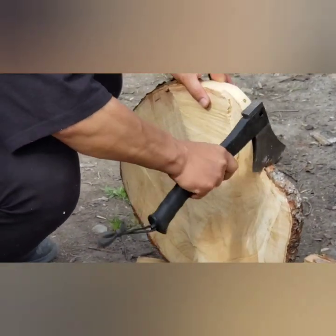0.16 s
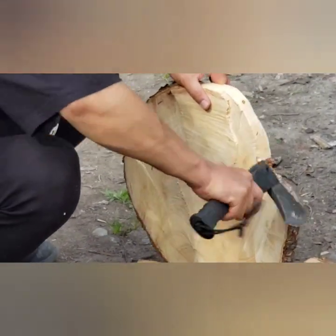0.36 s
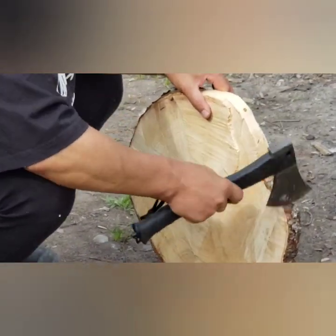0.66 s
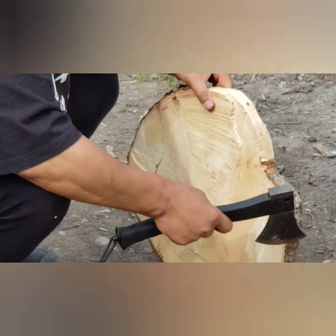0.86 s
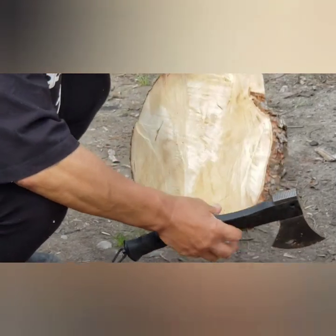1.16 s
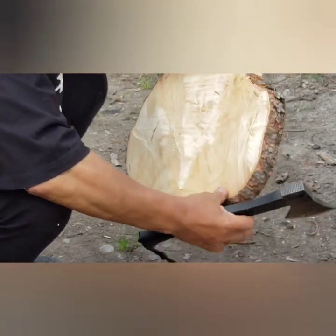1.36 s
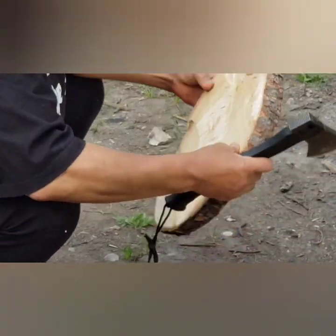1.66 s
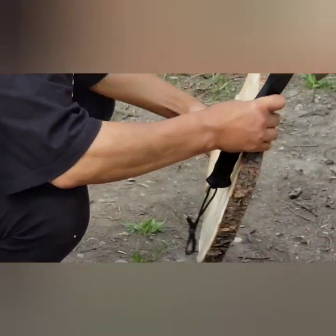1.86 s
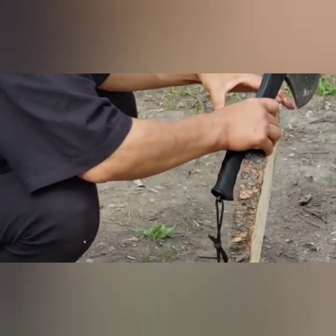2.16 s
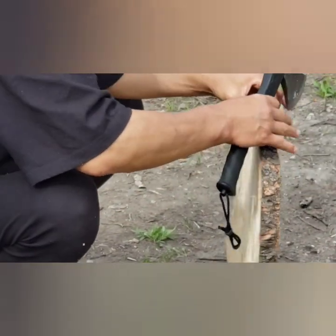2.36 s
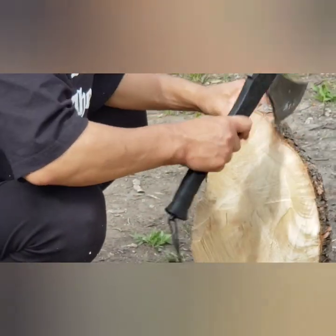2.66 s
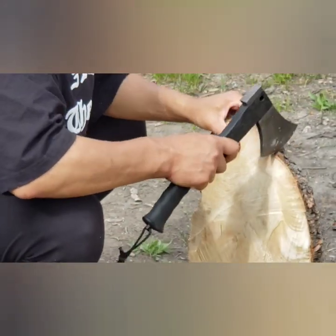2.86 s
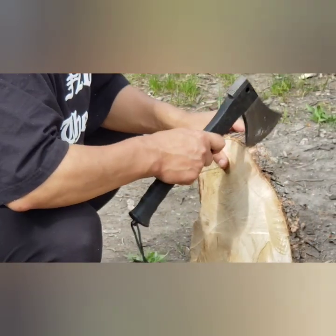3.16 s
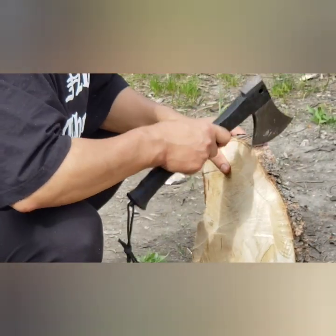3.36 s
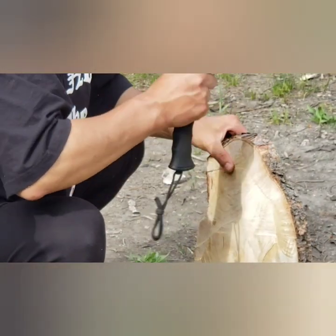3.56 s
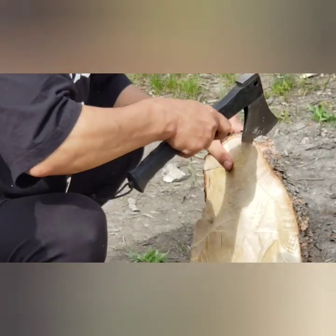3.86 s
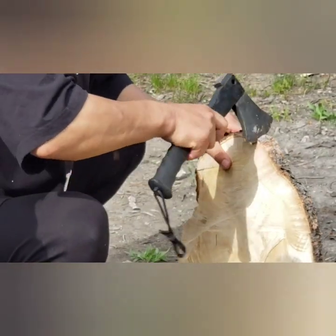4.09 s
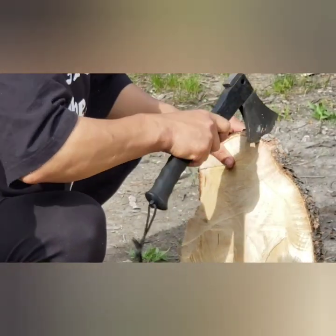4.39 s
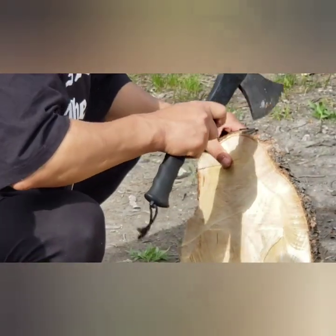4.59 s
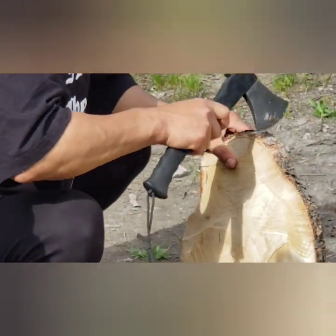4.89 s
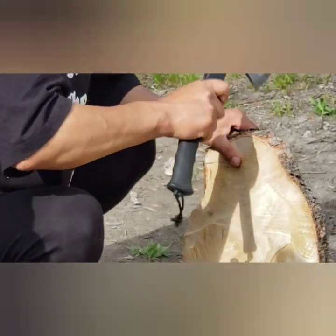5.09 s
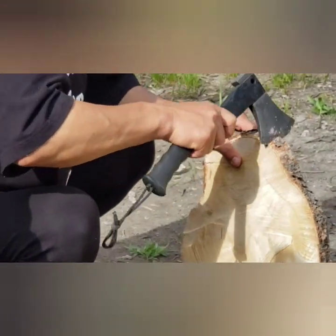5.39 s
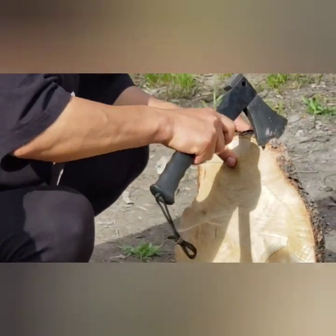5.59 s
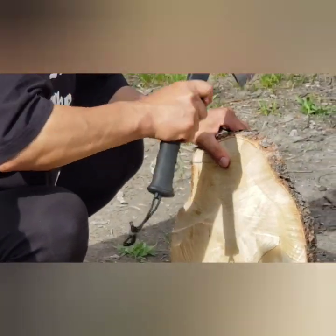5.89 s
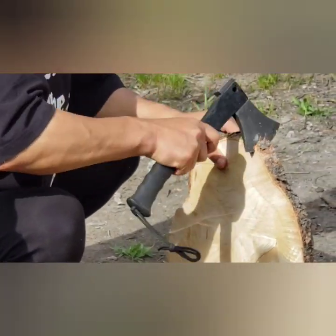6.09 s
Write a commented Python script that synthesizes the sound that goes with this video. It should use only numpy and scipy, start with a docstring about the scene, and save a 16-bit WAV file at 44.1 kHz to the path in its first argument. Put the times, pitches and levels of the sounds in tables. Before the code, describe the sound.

A hatchet chops and pries bark off a log slice outdoors, with sparse woody knocks, dry crackles, and wind buffeting the microphone midway.

```python
"""Hatchet on bark, outdoors

A hatchet chips and pries the bark off a log slice at an outdoor campsite. Each blow is a burst of
crushed-bark noise over decaying modes of the slab; short tuned noise bursts make single snaps and
the woody knock in the hardest blows, and crumbs rustle as random ticks. Midway, gusts buffet the
microphone as turbulent noise and short low thumps at each port. A low distant rumble, diffuse air,
a thin high hiss and a few faint gliding bird notes lie beneath."""
import sys
import numpy as np
from scipy import signal
from scipy.fft import rfft, irfft
from scipy.io import wavfile
from scipy.ndimage import uniform_filter1d

SR = 44100
rng = np.random.default_rng(int(sys.argv[2]) if len(sys.argv) > 2 else 0)


def bounce(signal):
    """Save signal as a 16-bit WAV file at the path given by the first command-line argument."""
    frames = np.transpose(np.atleast_2d(signal))
    limited = np.clip(frames, -1, 1)
    pcm = np.round(limited * 32767).astype(np.int16)
    wavfile.write(sys.argv[1], SR, pcm)


N = 275184
TIME = np.arange(N) / SR

# Levels in the tables are relative; most sources add a gain of their own.
# hatchet blows: time_s, knock_db, knock_tilt_db_per_octave, thud_db, crunch_db,
# crunch_tilt_db_per_octave, crunch_rise_s, right_over_left_db (crunch only)
BLOWS = [(0.2124, -49.5, 5, -47, -52, -2, 0.0043, 7.5), (.231, -53, 0, -41, -56.5, -4, 0.0082, 0),
         (.296, -47.5, 1, -39, -39, 7, 0.0015, 5), (0.3111, -53.5, 4, -51, -44.5, -1, 0.0036, 3.5),
         (2.066, -41, -15, -28, -49.5, -2, 0.0074, 8), (2.759, -60.5, -1.5, -52, -52.5, -4, 0.0087, 3),
         (3.192, -50.5, 7, -50, -40.5, 1, 0.00088, 1), (3.7185, -28, 5, -39, -36, 0.5, 0.0014, 6),
         (4.797, -50.5, 10, -62, -49.5, 3.5, 0.0048, 3.5), (5.188, -39.5, -2, -41, -35, 2.5, 0.0023, 1),
         (5.988, -30, -4, -38.5, -37.5, 2, 0.0024, 1.5)]
# short tuned noise bursts, single snaps and the woody knock within the hardest blows:
# time_s, level_db, centre_hz, right_over_left_db
TUNED_BURSTS = [(.042, -52.5, 11100, 10), (0.2104, -53.5, 4200, 19), (.293, -35, 11060, 15),
                (.2955, -31.5, 11000, 5), (.3091, -26, 11300, 16.5), (0.315, -35.5, 11500, -7),
                (0.3116, -44.5, 5730, 17.5), (.476, -52, 7660, 9), (1.712, -53, 11500, 6),
                (2.0688, -45, 3570, 11), (2.084, -49, 3570, 5), (2.444, -65, 5540, 15),
                (2.902, -64, 11000, 14), (3.1909, -37.5, 9760, 5), (3.2305, -45, 10500, -1),
                (3.2427, -45, 11300, -1), (3.357, -57.5, 10100, 17), (3.7186, -32.5, 1630, -3),
                (3.7319, -37, 3800, -3), (3.832, -54, 10700, 7), (4.078, -54, 10000, 6),
                (4.114, -44, 10500, 4), (4.115, -54, 4020, 10), (4.202, -43.5, 11600, 7),
                (5.189, -38, 2250, 3), (5.2012, -44, 4300, 11), (5.537, -64, 6860, 11),
                (5.99, -42.5, 1240, 5), (6.001, -41.5, 4350, 5), (6.016, -46.5, 4350, 0)]
# modes of the wooden slab: pitch_hz, level_db, t60_s
SLAB_MODES = [(610, -16, 0.042), (697, 3.5, 0.041), (856, -6.5, 0.048), (1259, -8, 0.047),
              (1514, -13, 0.017), (1920, -19, 0.025), (2430, -16.5, 0.022), (2667, -9, 0.013),
              (3810, -14.5, 0.024)]
# modes of the slab shoved against the ground: pitch_hz, level_db, t60_s
THUD_MODES = [(85.6, -1.5, 0.12), (137, -9.5, 0.18), (181, -3.5, 0.086), (235.7, -0.5, 0.081),
              (299.8, -3, 0.11), (373.4, -7, 0.087)]
# the blade pries at the bark: start_s, length_s, rise_s, level_db
PRIES = [(.035, 0.083, 0.013, -60), (0.18, 0.12, .015, -59), (1.523, 0.027, 0.013, -65),
         (1.701, 0.069, 0.013, -68.5), (2.04, 0.058, .012, -50), (2.11, 0.11, 0.021, -56.5),
         (2.296, .05, 0.035, -65.5), (2.431, 0.014, 0.013, -61), (2.592, 0.022, 0.023, -64.5),
         (3.21, .07, .025, -58), (4.055, 0.16, 0.043, -56)]
# range of small-splinter pitches: low_hz, high_hz
SPLINTER_RANGE = (3670, 11800)
# spectrum of crushed bark: frequency_hz, density_db
CRUNCH_SPECTRUM = [(300, -2.5), (750, 11), (1020, -2), (1500, 7), (2600, -0.5), (3900, 1), (5500, -9.5),
                   (7500, 0), (10500, -1), (13500, 1.5), (16000, -18.5)]
# spectrum of crumbling bark: frequency_hz, density_db
CRUMB_SPECTRUM = [(500, 0.5), (1500, -1.5), (3500, -8), (5800, -4), (8000, -4.5), (11500, -2.5),
                  (16000, -5)]
# microphone response at close range: frequency_hz, gain_db
PORT_RESPONSE = [(3000, -1.5), (4600, -3), (5600, 0.5), (6800, -7.5), (8500, -8.5), (10000, -7.5),
                 (11200, -5), (12600, -9), (16000, -10)]
# phase by which the left port trails: frequency_hz, lag_rad
LEFT_LAG = [(100, 0.29), (700, 0.12), (2000, 1), (4000, 0.99), (8000, 1), (12000, 0.8)]
# scatter from ground and trees: frequency_hz, t60_s
WOODS_DECAY = [(200, 0.24), (600, 0.34), (1500, 0.21), (4000, 0.21), (10000, 0.066), (16000, 0.28)]
# strength of that scattered tail: frequency_hz, gain_db
SCATTER_GAIN = [(150, 4.5), (350, -1.5), (750, -7), (1500, -4.5), (4000, -1.5), (7500, -3), (11500, -6.5),
                (15000, 4)]
# gusts on the microphone: start_s, length_s, left_db, right_db, eddy_share_db
GUSTS = [(1.625, .17, -28.5, -54, -24.5), (1.884, 0.034, -25.5, -44, -45), (2.003, .12, -27, -47, -17.5),
         (2.135, .29, -26, -37.5, -32), (2.264, 0.083, -25.5, -33.5, -17.5),
         (2.437, 0.13, -27, -45.5, -16.5), (2.581, .16, -24.5, -29.5, -17), (2.804, 0.1, -48, -34, -10),
         (2.873, 0.1, -40, -61, -19), (3.094, 0.071, -39, -35, -13), (3.17, 0.1, -34.5, -31.5, -6.5),
         (3.301, 0.091, -39.5, -47, -12.5)]
# the light wind that carries the gusts: start_s, length_s, left_db, right_db, eddy_share_db
BREEZE = (1.52, 2.03, -47, -48, -28)
# short low thumps of wind, hard or soft, some made of two overlapping pulses:
# time_s, level_db, pitch_hz, left_over_right_db
WIND_PULSES = [(.988, -37, 84, 9), (1.652, -16, 142, 34), (1.916, -21.5, 70, 16.5), (2.168, -16, 89, 24),
               (2.304, -16, 81.4, 19), (2.459, -14, 99, 30), (2.513, -21, 286, 30), (2.535, -17.5, 231, 33),
               (2.707, -24, 73.5, 9.5), (2.731, -19.5, 147, 8.5), (2.7417, -14.5, 295, 18.5),
               (2.837, -32, 149, -9), (3.136, -25, 130, -8.5), (3.174, -24, 109, -5), (3.25, -24.5, 80, 13),
               (3.328, -32, 156, 6.5)]
# spectrum of the slow pressure swings: frequency_hz, density_db
SWING_SPECTRUM = [(15, -34.5), (30, -12.5), (55, 1), (85, -4), (120, -6.5), (170, -11), (250, -26.5),
                  (400, -55), (700, -100)]
# spectrum of the smaller eddies: frequency_hz, density_db
EDDY_SPECTRUM = [(60, -50), (150, 5.5), (260, 3), (370, -4.5), (480, -16.5), (650, -23), (1000, -38),
                 (2000, -86)]
# far surroundings, before and after the wind: time_s, rumble_db, air_db
FAR = [
    [(0.0, -59.5, -74), (0.432, -59, -75), (1.45, -58, -77)],
    [(3.65, -67, -80.5), (5.18, -64, -79), (6.24, -69.5, -77.5)],
]
# spectrum of the far rumble: frequency_hz, density_db
RUMBLE_SPECTRUM = [(20, -23.5), (45, -6), (75, 1.5), (100, 3.5), (135, -11), (200, -22.5), (330, -22.5),
                   (600, -26), (1500, -89.5)]
# spectrum of the diffuse air: frequency_hz, density_db
AIR_SPECTRUM = [(100, -10), (300, 0.5), (480, -4.5), (750, 7.5), (1100, -2.5), (1750, 0.5), (2600, -11.5),
                (4000, -13.5), (6000, -20), (8500, -25), (12000, -13.5), (16000, -17)]
# thin high hiss in two bands: start_s, length_s, lower_band_db, upper_band_db
HISSES = [(2.1, 0.24, -80.5, -91), (2.88, 0.578, -83, -83)]
# spectrum of the lower hiss band: frequency_hz, density_db
HISS_LOW_SPECTRUM = [(4700, -14.5), (5050, 8), (5400, -7.5), (6000, -1), (6700, -9.5), (7800, -26)]
# spectrum of the upper hiss band: frequency_hz, density_db
HISS_HIGH_SPECTRUM = [(7500, -5), (9200, -2), (10200, 6), (11400, 2), (12500, -4.5), (15000, -31)]
# distant bird notes: start_s, length_s, start_hz, end_hz, level_db
BIRDS = [(1.27, 0.047, 2750, 2820, -84), (1.693, 0.044, 3140, 3280, -74), (1.926, 0.06, 3163, 3260, -70),
         (5.432, 0.052, 2600, 2750, -79), (5.56, 0.069, 2430, 2150, -75.5)]

BURST_LEAD_S = 0.003  # room for a tuned burst's onset before its peak
SPLINTER_GAP_S = 0.02
PRY_SAG_DB_PER_S, PRY_RELEASE_S = 72, 0.022  # the bark resists most at first, then gives way
GUST_ATTACK_S, GUST_RELEASE_S = 0.018, 0.021
GUST_SAG_DB_PER_S = 3  # a gust is strongest as it arrives
HISS_ATTACK_S, HISS_RELEASE_S = 0.051, 0.035
BIRD_TAIL_DB = -1.5
EDGE_HZ = 15950


def blows(knock_db=5, thud_db=3, crunch_db=1, crunch_fall_s=0.0049, grain_db=3,
          sink_s=0.00063, settle_db=-17, settle_s=0.043):
    """Impact excitation: the edge crushes bark, stops in wood that rings, and crumbs settle."""
    out, lead_s = np.zeros((2, N)), 0.03
    t = np.arange(8192) / SR - lead_s
    age = np.maximum(t, 0)
    for s, knock, tilt, thud, crunch, bright, rise_s, right_db in BLOWS:
        grains = rng.standard_normal((3, len(t))) * amp(grain_db * rng.standard_normal(len(t)))
        fall = np.exp(-age / crunch_fall_s) + amp(settle_db) * np.exp(-age / settle_s)
        crush = np.exp(np.minimum(t, 0) / rise_s) * fall
        # one shared grain stream plus one of each port's own
        fibres = colour(grains[0] + grains[1:], CRUNCH_SPECTRUM, bright) * crush
        knock_ring = amp(knock + knock_db) * ring(SLAB_MODES, t, tilt)
        thud_ring = amp(thud + thud_db) * ring(THUD_MODES, t)
        wood = (1 - np.exp(-age / sink_s)) * (knock_ring + thud_ring)
        bark = amp(crunch + crunch_db) * fibres
        add(out, s - lead_s, bark * sides(right_db) + wood * sides(-0.9))
    return out


def ring(modes, t, tilt_db=0):
    """Modal superposition: damped sines from t = 0, tilted by so many dB an octave."""
    hz, db, t60 = np.transpose(modes)[:, :, None]
    size = amp(db + tilt_db * np.log2(hz / hz[0]))
    age = np.maximum(t, 0)
    # each blow lands on another spot, which shifts the modes a little
    detune = 1 + 0.012 * rng.standard_normal(hz.shape)
    sign = (-1) ** np.arange(len(hz))[:, None]
    decay = amp(-60 * age / t60)
    partials = sign * size * decay * np.sin(2 * np.pi * hz * detune * age)
    return partials.sum(0) / np.linalg.norm(size)


def snaps_and_knocks(burst_db=3):
    """Impulsive resonance: single snaps, and the woody knock within the hardest blows."""
    out = np.zeros((2, N))
    for s, db, centre_hz, right_db in TUNED_BURSTS:
        add(out, s - BURST_LEAD_S, amp(db + burst_db) * tuned_burst(centre_hz) * sides(right_db))
    return out


def tuned_burst(centre_hz, cycles=8, octaves=0.19, skirt=0.16, rise_s=0.0003):
    """Damped resonance: noise about a centre pitch dies in a few cycles, so lower bursts last longer."""
    hz, t = np.fft.rfftfreq(1024, 1 / SR), np.arange(1024) / SR - BURST_LEAD_S
    resonance = np.exp(-0.5 * (np.log2((hz + 1) / centre_hz) / octaves) ** 2)
    shape = resonance + skirt * hz / (hz + 1500)
    burst = np.exp(np.where(t < 0, t / rise_s, -t * centre_hz / cycles))
    tuned = irfft(rfft(rng.standard_normal(len(t))) * shape)
    return unit(tuned * burst) * np.sqrt(np.mean(burst ** 2))


def splintering(blow_db=-9, spray_s=0.04, blow_fade_db_per_s=420, pry_db=-1):
    """Fracture cascade: bark splinters briefly after each blow, and all along each pry."""
    out = np.zeros((2, N))
    for s, _, _, _, crunch, *_ in BLOWS:
        out += splinters(s, spray_s, crunch + blow_db, blow_fade_db_per_s, count=4)
    for s, length, rise_s, db in PRIES:
        count = int(length / SPLINTER_GAP_S) + 1
        out += splinters(s + rise_s / 2, length, db + pry_db, PRY_SAG_DB_PER_S, count)
    return out


def splinters(start, length, db, fade_db_per_s, count, spread_db=3, right_db=8):
    """Stochastic emission: small flakes at random moments and pitches, on the whole growing weaker."""
    out, (low_hz, high_hz) = np.zeros((2, N)), SPLINTER_RANGE
    for k, (when, pitch, size) in enumerate(rng.random((count, 3))):
        age = length * (k + when) / count
        gain = amp(db - fade_db_per_s * age + spread_db * (2 * size - 1))
        centre_hz = low_hz * (high_hz / low_hz) ** pitch
        add(out, start + age - BURST_LEAD_S, gain * tuned_burst(centre_hz) * sides(right_db))
    return out


def crumbs(per_s=7000, crumb_db=-1, right_db=7):
    """Random granular noise: under each pry, bark crumbles in clumps of tiny ticks."""
    effort = sum(amp(db) * swell(s, length, rise_s, PRY_RELEASE_S, PRY_SAG_DB_PER_S)
                 for s, length, rise_s, db in PRIES)
    strikes = rng.random(N) < per_s / SR
    sizes = rng.standard_normal(N) + 2.1 * rng.standard_normal((2, N))  # shared + each port's own
    ticks = strikes * sizes * clumps(span_s=0.0044, depth_db=2.0)
    return amp(crumb_db) * colour(ticks, CRUMB_SPECTRUM) * effort * sides(right_db)


def woods(x, build_s=0.004):
    """Diffuse scattering: ground and trees return a short noise tail, decaying by frequency."""
    hz, t, z = signal.stft(rng.standard_normal((2, SR // 2)), SR, nperseg=256)
    decay = amp(-60 * t / read(WOODS_DECAY, hz)[:, None])
    tail = signal.istft(z * decay * (1 - np.exp(-t / build_s)), SR, nperseg=256)[1]
    tail = tail / np.linalg.norm(tail[0])
    return signal.fftconvolve(x.mean(0)[None], tail, axes=1)[:, :N]


def wind(buffet_db=-1, eddy_db=-1, lumpy=0.78, pulse_cycles=0.77, burst_s=0.0062,
         burst_db=-17, burst_db_per_octave=4):
    """Turbulent pressure at each port: swings shed smaller eddies, and quick pulses shed the most."""
    swings, eddies = turbulence(SWING_SPECTRUM), turbulence(EDDY_SPECTRUM, steady_s=0.027)
    swing_power, eddy_power = np.zeros((2, 2, N))
    for s, length, left, right, share in GUSTS + [BREEZE]:
        envelope = swell(s, length, GUST_ATTACK_S, GUST_RELEASE_S, GUST_SAG_DB_PER_S)
        power = (amp([[left], [right]]) * envelope) ** 2
        swing_power += power
        eddy_power += power * amp(share) ** 2
    buffets = amp(buffet_db) * np.sqrt(swing_power) * swings
    shed = unit(eddies * (1 + lumpy * swings)) * clumps(span_s=0.014, depth_db=2.5)
    out = buffets + amp(eddy_db) * np.sqrt(eddy_power) * shed
    for s, db, hz, left_db in WIND_PULSES:
        t, facing = TIME - s, sides(-left_db)
        push = np.exp(-(t * hz / pulse_cycles) ** 2) * np.sin(2 * np.pi * hz * t)
        burst_gain = amp(burst_db + burst_db_per_octave * np.log2(hz / 100))
        burst = burst_gain * np.exp(-(t / burst_s) ** 2)
        out += amp(db) * facing / facing.max() * (push + burst * eddies)
    return out


def turbulence(spectrum, steady_s=0.066):
    """Short-term power normalisation: unrelated eddies at each port keep an even strength."""
    x = noise(spectrum)
    local_power = uniform_filter1d(x ** 2, max(int(steady_s * SR), 2), axis=1)
    return x / np.sqrt(local_power + 0.011)


def hisses(right_db=14):
    """Band-limited noise: a thin, uneven hiss comes and goes."""
    low, high = noise(HISS_LOW_SPECTRUM), noise(HISS_HIGH_SPECTRUM)
    out = np.zeros((2, N))
    for s, length, low_db, high_db in HISSES:
        bands = amp(low_db) * low + amp(high_db) * high
        out += swell(s, length, HISS_ATTACK_S, HISS_RELEASE_S) * bands
    return out * clumps(span_s=0.029, depth_db=1.5) * sides(right_db)


def birds():
    """Frequency-gliding tones: short far whistles, their level fluttering, with a scattered tail."""
    out = np.zeros((2, N))
    for s, length, start_hz, end_hz, db in BIRDS:
        hz = np.linspace(start_hz, end_hz, int(length * SR))
        whistle = np.hanning(len(hz)) * np.sin(2 * np.pi * np.cumsum(hz) / SR)
        add(out, s, amp(db) * whistle * sides(3))
    out = out * clumps(span_s=0.0045, depth_db=3.5)
    return out + amp(BIRD_TAIL_DB) * woods(out)


def surroundings(apart=0.35, rumble_db=2, air_db=7.5):
    """Spatial coherence: a far rumble nearly alike at both ports, under diffuse unrelated air."""
    rumble_level, air_level = curves(np.vstack(FAR))
    shared = noise(RUMBLE_SPECTRUM)[0]
    rumble = unit(shared + apart * noise(RUMBLE_SPECTRUM)) * clumps(span_s=0.083, depth_db=2.0)
    air = noise(AIR_SPECTRUM)
    return amp(rumble_level + rumble_db) * rumble + amp(air_level + air_db) * air


def amp(db):
    """Logarithmic level: decibels to amplitude gain."""
    return 10 ** (np.asarray(db) / 20)


def unit(x):
    """Power normalisation: scales to rms 1."""
    return x / np.sqrt(np.mean(x ** 2) + 1e-20)


def read(points, hz):
    """Log-frequency interpolation of a spectrum table."""
    f, value = np.transpose(points)
    return np.interp(np.log(hz + 1), np.log(f), value)


def curves(rows):
    """Linear interpolation in time of each column, at every sample."""
    s, *columns = np.transpose(rows)
    return [np.interp(TIME, s, c) for c in columns]


def filtered(x, spectrum, tilt_db=0):
    """Zero-phase filtering by a spectrum table, tilted by so many dB an octave above 1 kHz."""
    size = x.shape[-1]
    hz = np.fft.rfftfreq(size, 1 / SR)
    tilt = tilt_db * np.log2(np.maximum(hz / 1000, 1))
    return irfft(rfft(x) * amp(read(spectrum, hz) + tilt), size)


def colour(x, spectrum, tilt_db=0):
    """Spectral shaping: filters x, at rms 1."""
    return unit(filtered(x, spectrum, tilt_db))


def noise(spectrum):
    """Incoherent sources: unrelated coloured noise for both ports."""
    return colour(rng.standard_normal((2, N)), spectrum)


def clumps(span_s, depth_db):
    """Random amplitude modulation: a gain that swells and sinks over the given span."""
    drift = uniform_filter1d(rng.standard_normal(N), max(int(span_s * SR), 2))
    return unit(amp(depth_db * unit(drift)))


def swell(start, length, attack_s, release_s, sag_db_per_s=0):
    """Amplitude envelope: attack, sagging hold and release of one event, at every sample."""
    age = TIME - start
    attack = np.clip(age / attack_s, 0, 1)
    sag = amp(-sag_db_per_s * np.clip(age, 0, length))
    return attack * sag * np.exp(-np.clip((age - length) / release_s, 0, 20))


def sides(right_db):
    """Interchannel level difference, split evenly into left and right gains."""
    return amp(np.array([-right_db, right_db]) / 2).reshape(2, -1)


def add(mix, s, sound):
    """Linear superposition: mixes a stereo sound in at time s."""
    part = mix[:, max(round(s * SR), 0):][:, :sound.shape[1]]
    part += sound[:, :part.shape[1]]


def scene():
    """Interport phase: the work lies a little to the right, so it reaches the left port later."""
    work = filtered(blows() + snaps_and_knocks() + splintering() + crumbs(), PORT_RESPONSE)
    lag = read(LEFT_LAG, np.fft.rfftfreq(N, 1 / SR))
    work[0] = irfft(rfft(work[0]) * np.exp(-1j * lag), N)
    tail = amp(-12.5) * filtered(woods(work), SCATTER_GAIN)
    return work + tail + wind() + surroundings() + hisses() + birds()


def record(dry):
    """Band limiting: a steep linear-phase low-pass removes the top of the spectrum."""
    lowpass = signal.firwin(511, EDGE_HZ, window=("kaiser", 9), fs=SR)
    return signal.oaconvolve(dry, lowpass[None], "same")


dry = scene()
out = record(dry)
bounce(out)
```